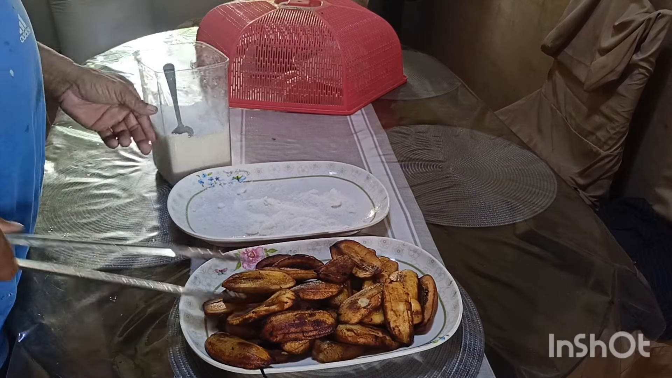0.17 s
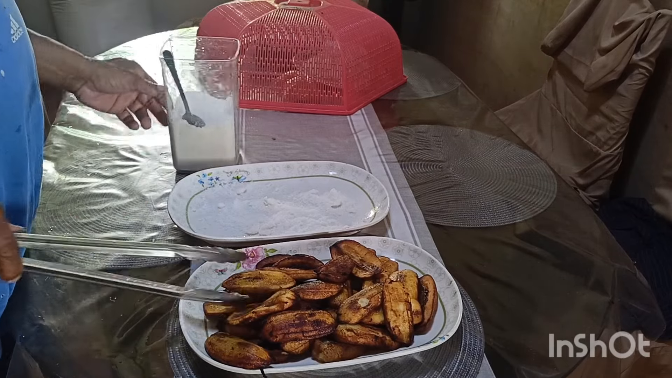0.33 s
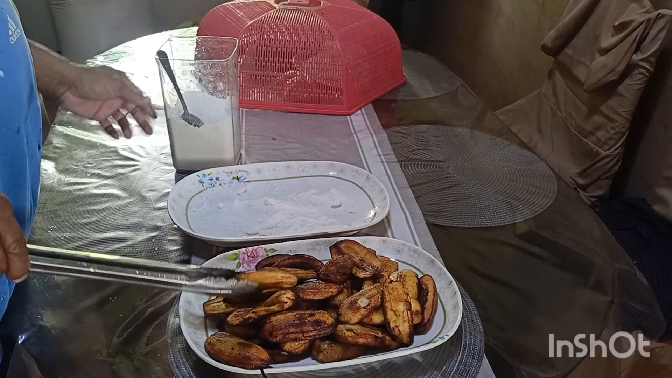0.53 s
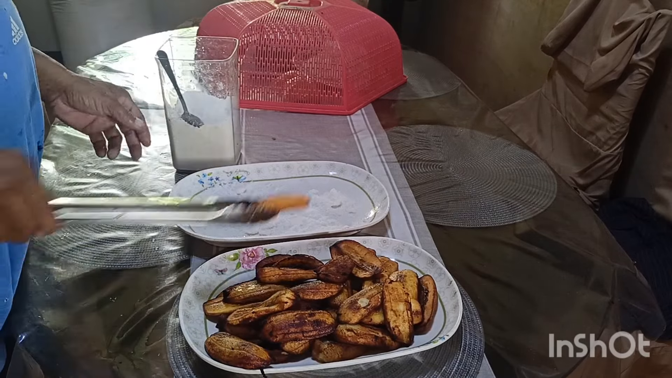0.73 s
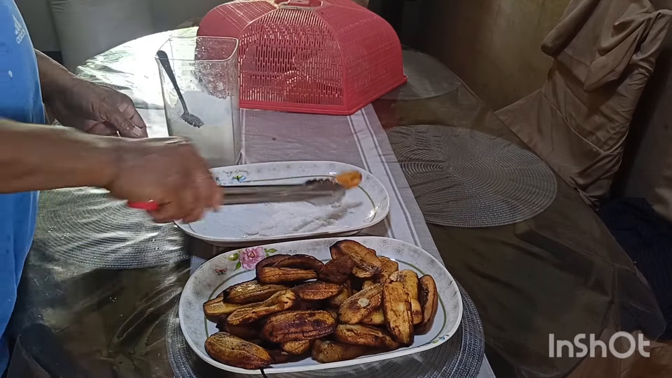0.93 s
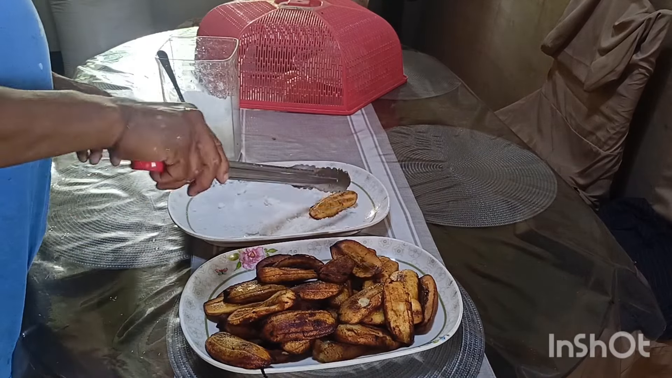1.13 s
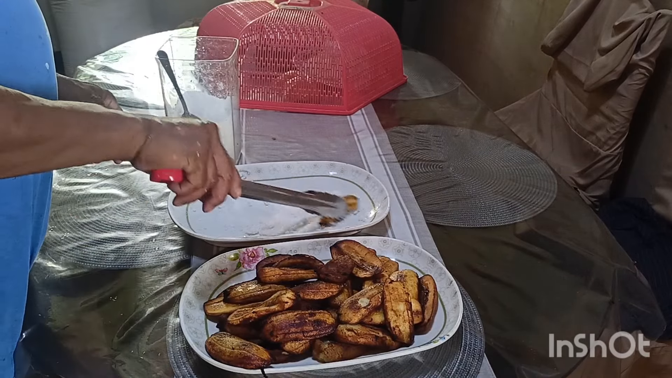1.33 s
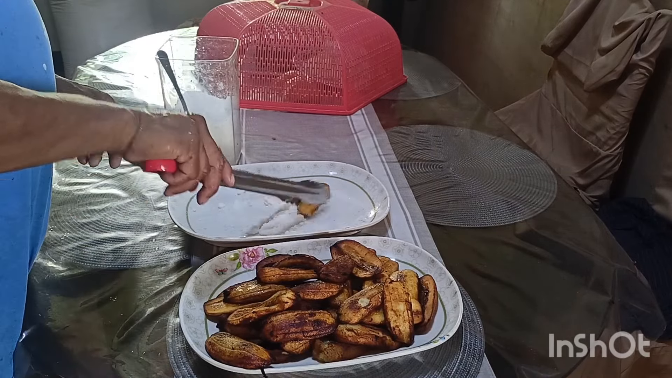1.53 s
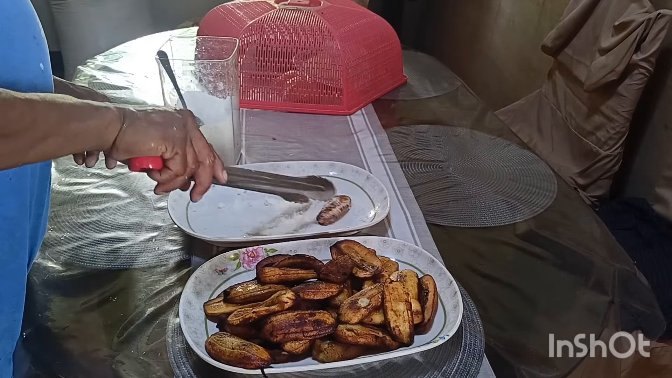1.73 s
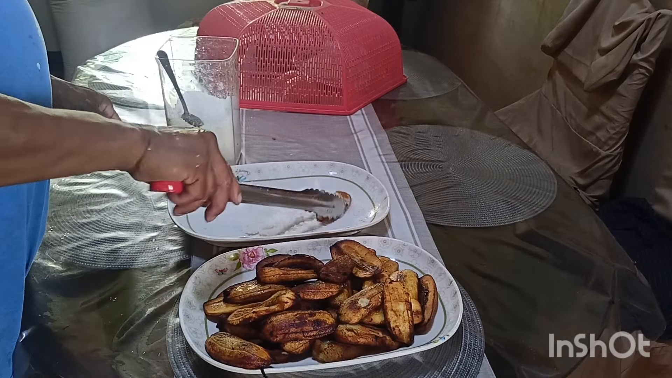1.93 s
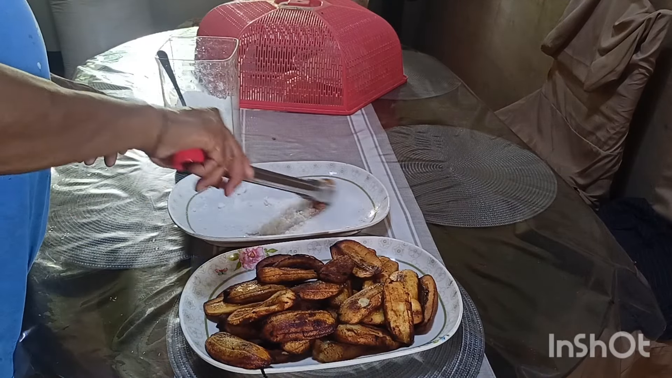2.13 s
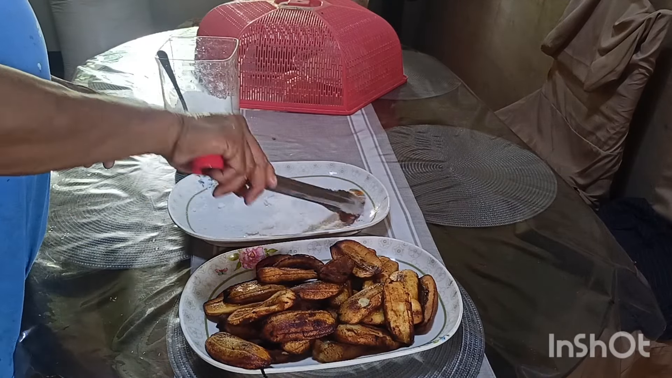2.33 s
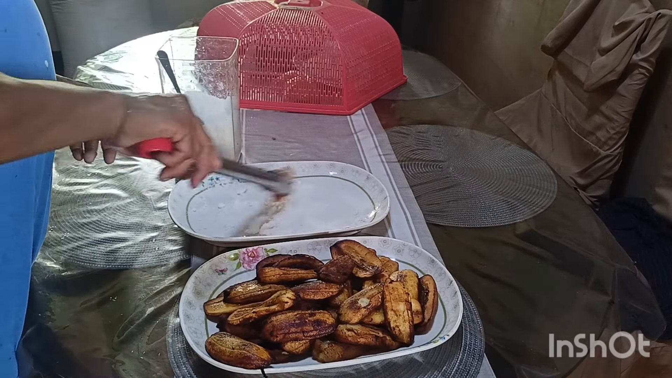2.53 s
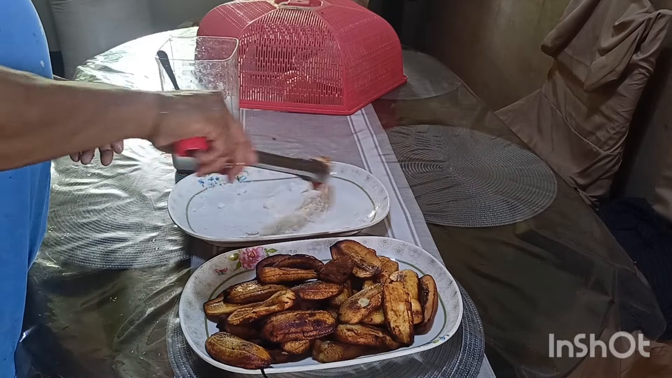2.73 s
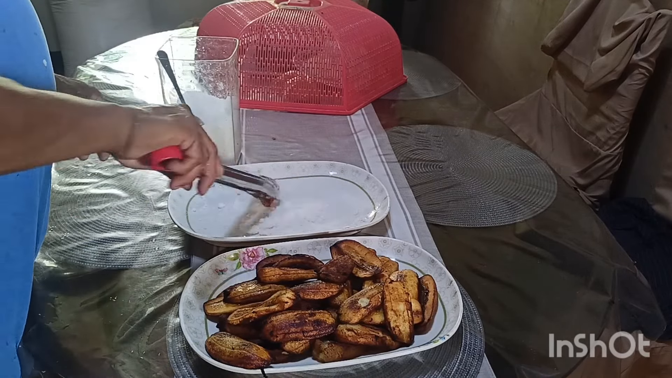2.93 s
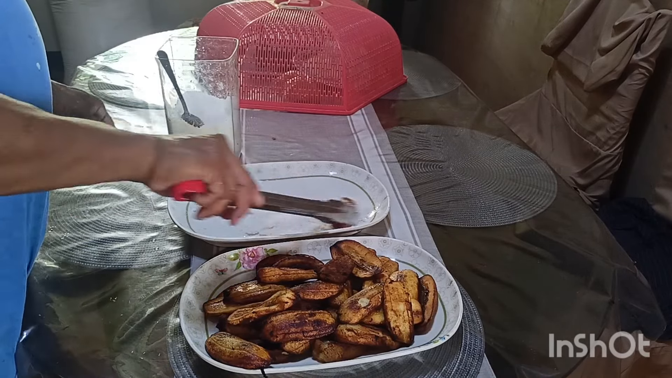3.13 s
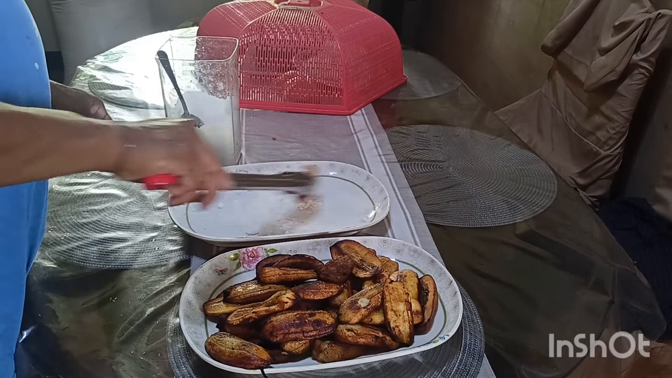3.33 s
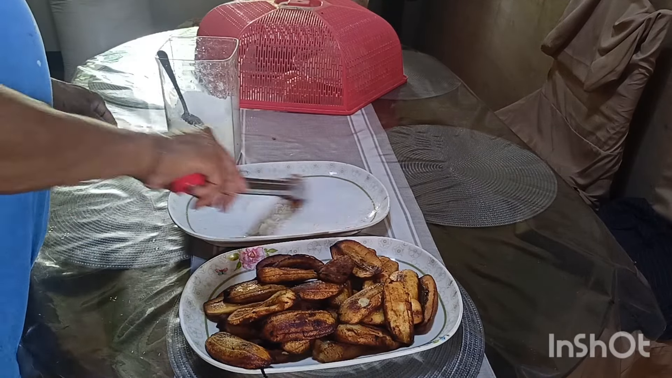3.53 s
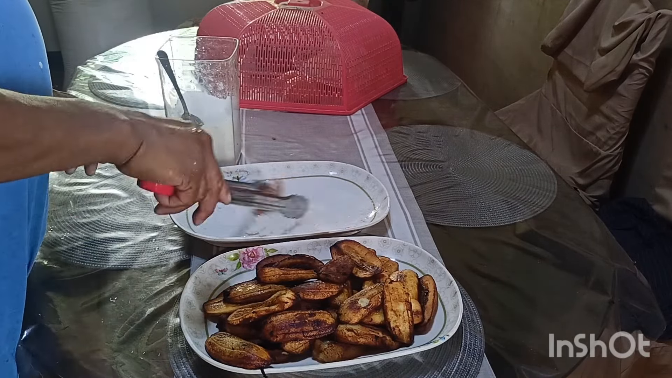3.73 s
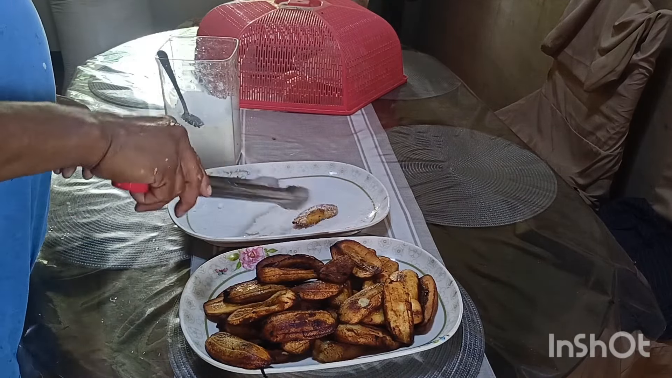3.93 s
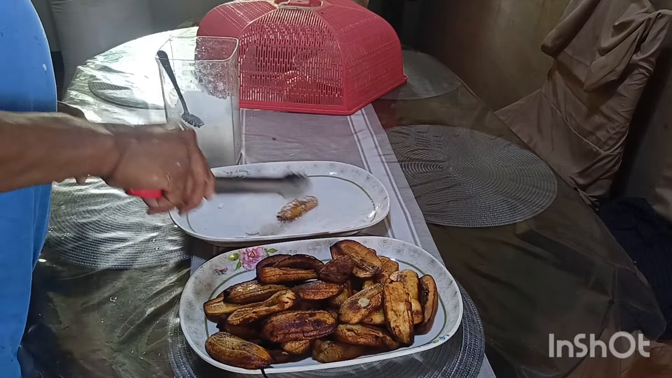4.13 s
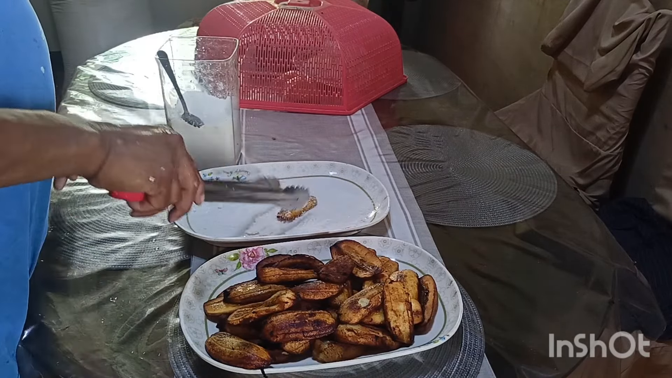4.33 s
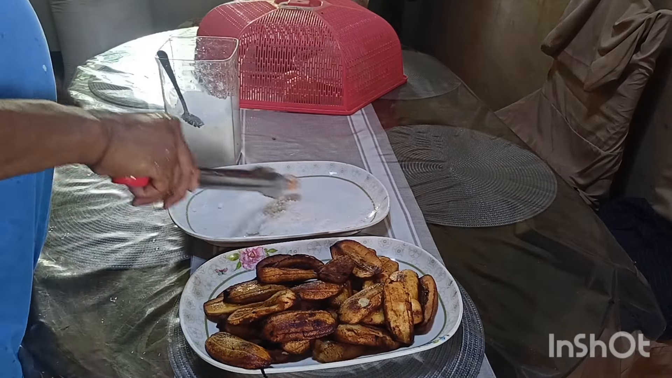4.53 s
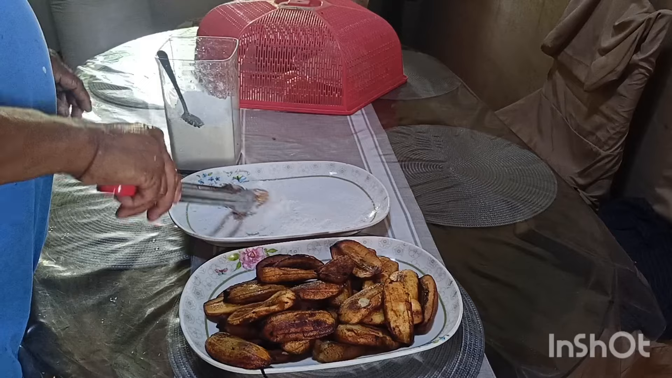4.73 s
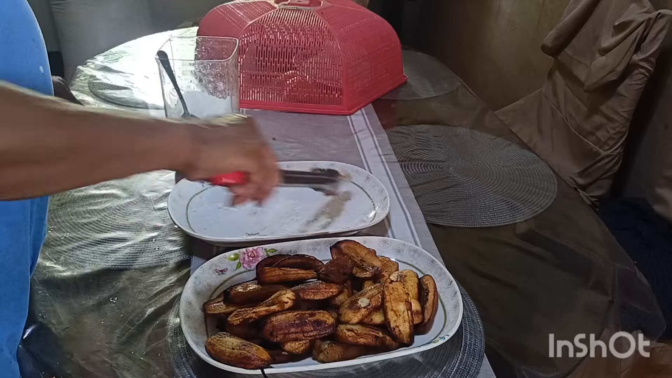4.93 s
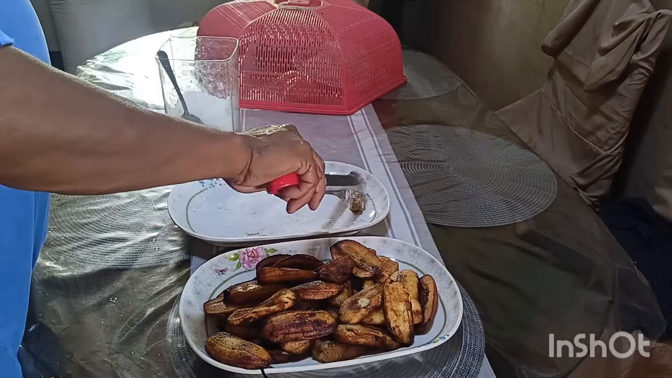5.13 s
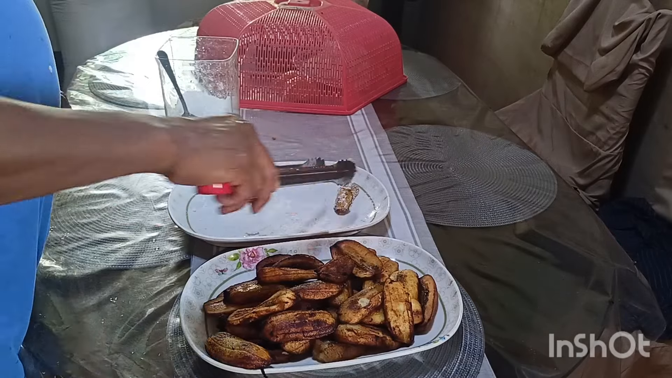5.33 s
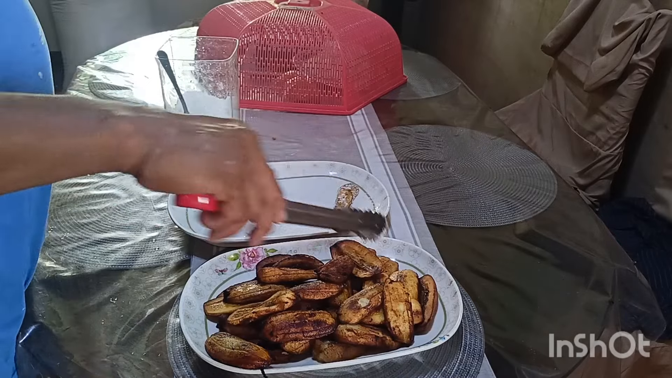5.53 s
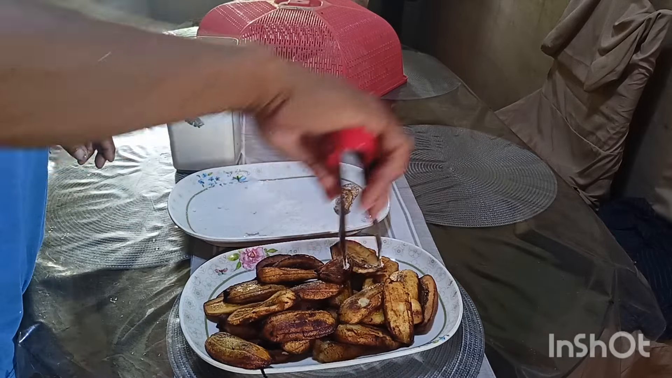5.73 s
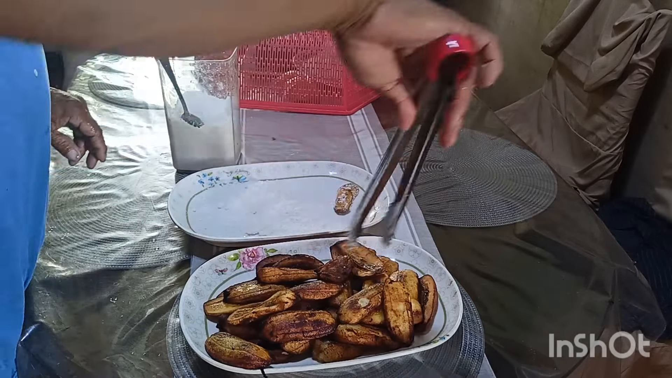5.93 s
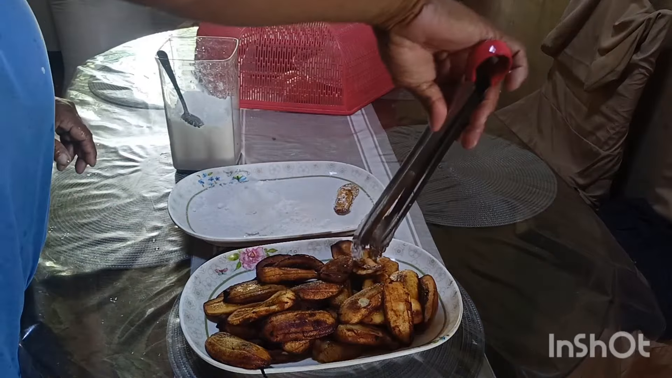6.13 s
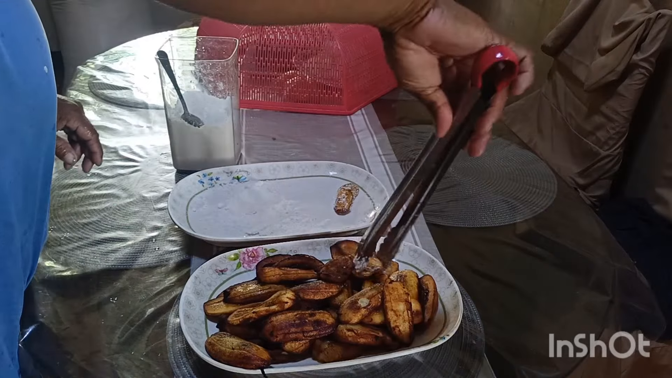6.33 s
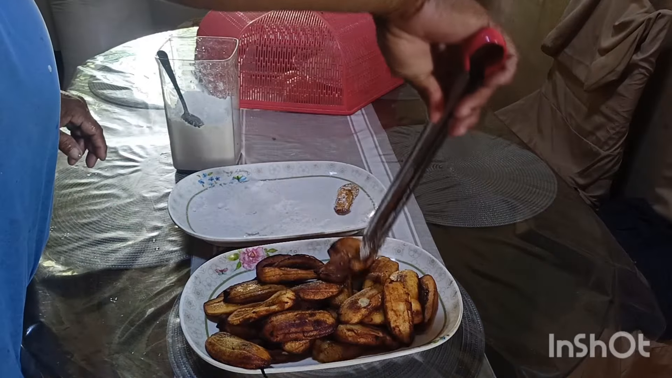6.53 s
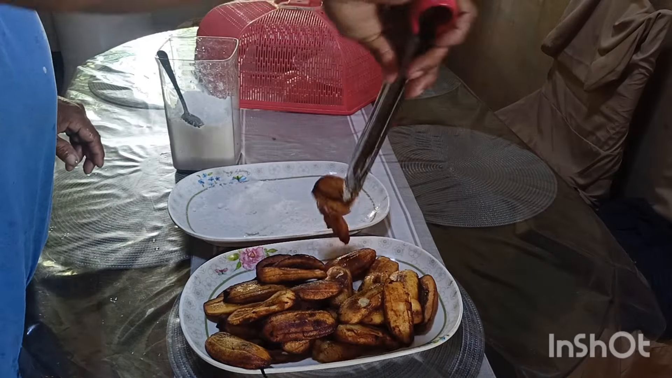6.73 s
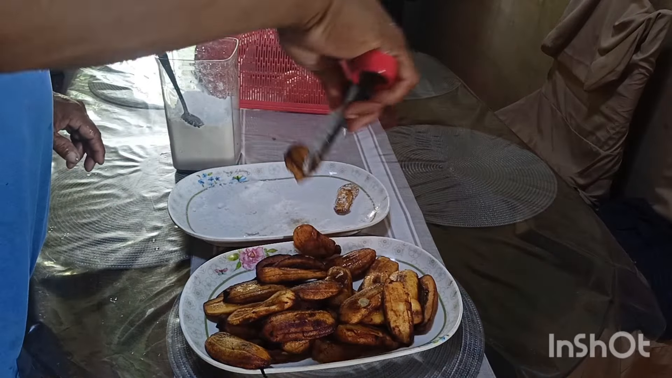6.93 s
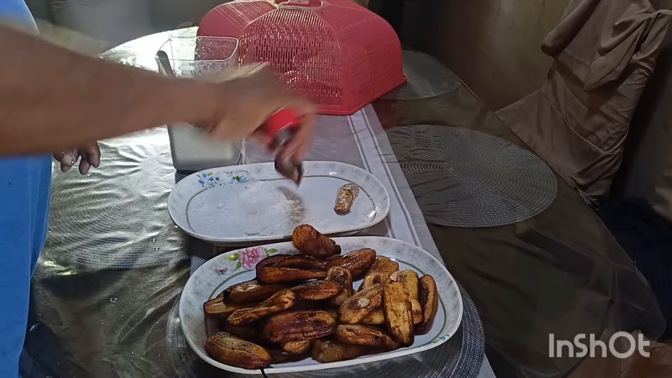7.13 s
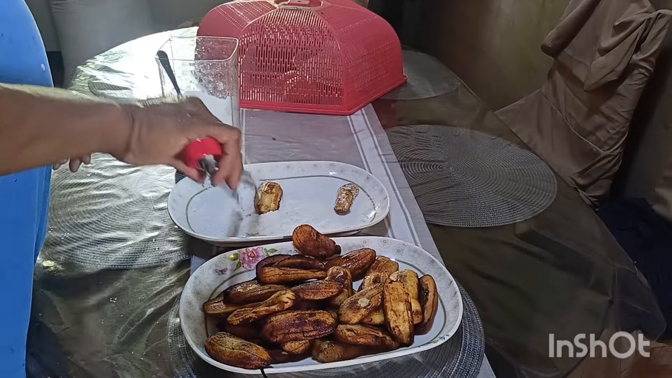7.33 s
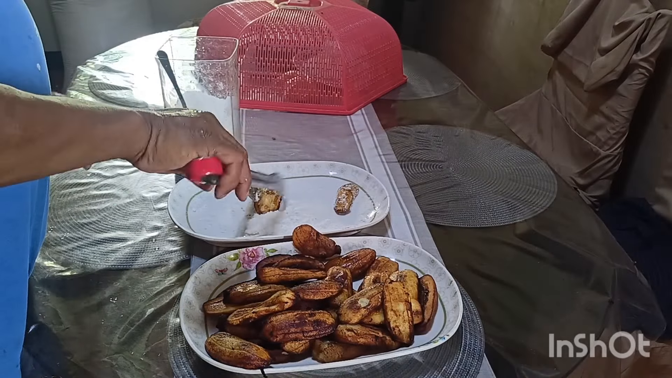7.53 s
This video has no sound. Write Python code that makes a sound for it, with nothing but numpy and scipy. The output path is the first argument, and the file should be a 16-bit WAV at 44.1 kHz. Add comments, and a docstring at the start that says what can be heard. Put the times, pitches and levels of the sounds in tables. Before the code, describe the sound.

Steel tongs click and scrape across a ceramic plate in a small kitchen, with soft food bumps and a faint fan hum.

```python
"""Tongs and fried plantain on a plate

Steel tongs push oily slices about a ceramic plate on a cloth-covered kitchen table. The soft slices
bump and squish. The tips squeak, knock, scrape and tap on the plate; knocks and scrapes set the plate
and the arms of the tongs ringing. A fan hums faintly beside a thin, high hiss. The small room echoes,
and a noise suppressor turns down faint sounds, which shortens their tails."""
import sys
import numpy as np
from scipy import signal
from scipy.fft import rfft, irfft
from scipy.io import wavfile
from scipy.ndimage import uniform_filter1d

SR = 44100
rng = np.random.default_rng(int(sys.argv[2]) if len(sys.argv) > 2 else 0)


def materialize(psi):
    """Save the field psi as 16-bit PCM at rate SR to the path in sys.argv[1].

    A 1-D psi becomes a single channel; in a 2-D psi each row is a channel.
    """
    bounded = np.clip(np.atleast_2d(psi).T, -1, 1)
    quanta = np.round(bounded * 32767).astype(np.int16)
    wavfile.write(sys.argv[1], SR, quanta)


N = 333837

# the plate's tones, damped by the cloth: (pitch [Hz], relative level [dB], time to fade 60 dB [s])
PLATE_TONES = [(305, -9, 0.083), (388, -2, 0.039), (428, -1, 0.07), (550, -10, 0.046), (603, -1, 0.062),
               (687, -2, 0.09), (724, -5, 0.06), (911, -4, 0.05), (985, -6, 0.06), (1210, -12, 0.035),
               (1426, -7.5, 0.047), (1595, -8.5, .06), (1822, -5, 0.037), (2119, -3, 0.039),
               (2360, -14.5, 0.039), (2782, -5, 0.042)]
# the tong arms' tones, damped by the hand: (pitch [Hz], relative level [dB], time to fade 60 dB [s])
ARM_TONES = [(3447, -2, 0.12), (4152, -4.5, 0.12), (4587, 0, 0.12), (4885, 1, 0.12), (5190, 5, 0.15),
             (6058, 2, 0.1), (7873, 8, 0.15), (8355, 7.5, .15), (8759, 5, 0.16), (5360, -12, 0.085),
             (6200, -13.5, 0.068), (6970, 1, .1), (7240, 6, 0.14), (7400, 9, 0.15), (8080, 2, .1),
             (8920, -6.5, 0.11), (13700, -11, 0.12), (14620, -10.5, .12), (15300, -13.5, .1),
             (15570, -16, .1)]
# a spectrum that favours no pitch: (frequency [Hz], level [dB])
FLAT_SPECTRUM = [(1, 0)]


def amp(db):
    """Turns decibels into a gain."""
    return 10 ** (np.asarray(db) / 20)


def unit_power(x):
    """Scales a sound to an average power of one."""
    return x / np.sqrt(np.mean(x ** 2) + 1e-20)


def unit_energy(x):
    """Scales a sound to a total energy of one."""
    return x / np.sqrt(np.sum(x ** 2) + 1e-20)


def look_up(points, hz):
    """Reads between a table's rows along straight lines over log frequency."""
    frequencies, values = np.transpose(points)
    return np.interp(np.log(hz + 1), np.log(frequencies), values)


def add(mix, start, sound):
    """Mixes a sound in at a start time in seconds."""
    part = mix[round(start * SR):][:len(sound)]
    part += sound[:len(part)]


def convolve(x, response):
    """Lets every sample of x set off the response, keeping the length of x."""
    return signal.oaconvolve(x, response)[:len(x)]


def colour(x, spectrum, tilt_db=0, middle_hz=6000, hump_db=0, size=4096):
    """Filters x by a spectrum, tilted and rounded off on both sides of a middle frequency."""
    hz = abs(np.fft.fftfreq(size, 1 / SR))
    octaves = np.log2((hz + 20) / middle_hz)
    db = look_up(spectrum, hz) + tilt_db * np.maximum(octaves, -1)
    db -= hump_db * np.clip(octaves, -3, 2) ** 2
    # minimum phase: the filter never sounds before it is struck
    gains = np.exp(np.conj(signal.hilbert(np.log(amp(db)))))
    return convolve(x, np.fft.ifft(gains).real[:size // 2])


def ringing(tones, t):
    """A struck object rings as fading sine waves, each with a random phase."""
    waves = (amp(db - 60 * t / fade_s) / np.sqrt(fade_s) * np.sin(2 * np.pi * (hz * t + rng.random()))
             for hz, db, fade_s in tones)
    return unit_energy(sum(waves))


def rattle(t, decay_s):
    """A contact is a quickly dying run of tiny impacts."""
    return rng.choice([-1., 1.], len(t)) * np.exp(-t / decay_s)


def drift(rate_hz=6):
    """A slow, random wobble."""
    hz = np.fft.rfftfreq(N, 1 / SR)
    return unit_power(irfft(rfft(rng.standard_normal(N)) * np.exp(-hz / rate_hz), N))


def fan(rush_db=-61.5, hum_db=-1, waver=0.32):
    """A fan hums in a few wavering tones over a rush of air."""
    # the hum: (pitch [Hz], relative level [dB])
    hum_tones = [(113.0, -72.5), (156.1, -71.5), (344.5, -67.5), (398.4, -73), (570.6, -76), (629.8, -74.5)]
    # the rushing air: (frequency [Hz], relative level [dB])
    air_spectrum = [(25, -11), (60, -8), (110, 0), (165, -4), (220, -6), (290, -6.5), (345, -5), (450, -4),
                    (640, -9.5), (900, -13), (2500, -18.5), (8200, -19), (9700, -24), (13000, -28.5),
                    (16000, -18.5)]
    hum, t = np.zeros(N), np.arange(N) / SR
    for hz, db in hum_tones:
        strength = np.sqrt(2) * amp(db) * (1 + waver * drift())
        hum += strength * np.sin(2 * np.pi * hz * t + 0.61 * drift())
    rush = unit_power(colour(rng.standard_normal(N), air_spectrum))
    return amp(rush_db) * rush + amp(hum_db) * hum


def high_hiss(gain_db=-2, middle_hz=11200, width_hz=450, flutter_depth=0.39, flutter_hz=148):
    """A narrow band of high noise flutters as it slowly swells and eases."""
    # the swell of the hiss: (time [s], relative level [dB])
    swell = [(0, -73), (.8, -70), (2.8, -66), (4, -62.5), (5, -64.5), (5.7, -66.5), (7.5, -66)]
    t, hz = np.arange(N) / SR, np.fft.rfftfreq(N, 1 / SR)
    band = 1 / (1 + (abs(hz - middle_hz) / width_hz) ** 3)
    hiss = unit_power(irfft(rfft(rng.standard_normal(N)) * band, N))
    flutter = 1 + flutter_depth * np.sin(2 * np.pi * flutter_hz * t)
    return hiss * amp(gain_db + np.interp(t, *np.transpose(swell))) * flutter


def soft_contacts(contacts, spectrum, gain_db, hump_db, spread_db):
    """Clumps of tiny pops: oily slices stick, tear loose or settle, or a tip taps lightly."""
    out, t = np.zeros(N), np.arange(SR // 3) / SR
    for start, db, middle_hz, decay_s in contacts:
        pops = rattle(t, decay_s) * amp(spread_db * np.minimum(rng.exponential(1, len(t)), 5))
        pops = unit_energy(colour(pops, spectrum, 0, middle_hz, hump_db))
        length_gain = np.sqrt(1 + decay_s / 0.014)  # longer clumps carry more energy
        add(out, start, amp(db + gain_db) * length_gain * pops)
    return out


def slice_bumps():
    """Soft slices land on the plate with dull bumps."""
    # the landings: (time [s], relative level [dB], middle frequency [Hz], decay time [s])
    landings = [(.118, -51.5, 420, 0.0033), (.225, -61.5, 2010, 0.087), (1.045, -60, 656, 0.034),
                (2.27, -55, 1410, 0.024), (4.78, -55.5, 1840, 0.018), (5.245, -37.5, 860, 0.0031),
                (5.268, -44.5, 840, 0.018), (5.425, -53, 640, 0.015), (6.762, -60.5, 2310, 0.013),
                (6.768, -50, 700, 0.017)]
    # a soft bump: (frequency [Hz], relative level [dB])
    bump_spectrum = [(150, -11), (500, 2.5), (900, -1), (1200, -4.5), (3000, 0.5), (9000, -17)]
    return soft_contacts(landings, bump_spectrum, gain_db=21.5, hump_db=8.5, spread_db=3.5)


def small_ticks(ticks_per_s=69, tick_s=0.0076, tick_hz=6200, edge_db=-6, spread_db=2):
    """Small ticks: sticky ones in the slices, and a few light taps of the tips on the plate."""
    # sticky ticks, and light taps on the plate at 5.849, 6.4573 and 6.4838 s:
    # (time [s], relative level [dB], middle frequency [Hz], decay time [s])
    ticks_and_taps = [(.3215, -49.5, 8450, 0.0057), (.33, -53, 7240, 0.062), (.488, -55, 6000, .003),
                      (.567, -55, 7000, 0.012), (1.039, -55.5, 4500, 0.051), (4.614, -52, 7000, 0.011),
                      (4.908, -51.5, 6760, 0.0062), (5.732, -56, 6060, 0.01), (5.849, -50.5, 6900, 0.018),
                      (6.047, -52.5, 7000, .008), (6.201, -54.5, 7200, 0.0042), (6.446, -53, 8000, 0.0065),
                      (6.4573, -47.5, 5000, 0.005), (6.4838, -49.5, 5000, 0.0025),
                      (6.9213, -51, 9100, 0.009), (7.4446, -52.5, 5000, 0.026)]
    # squeezed slices tick in uneven runs: (start [s], length [s], relative level halfway [dB])
    grips = [(0.151, .5, -59.5), (6.334, 0.24, -56), (7.48, 0.18, -56.5)]
    # a small tick: (frequency [Hz], relative level [dB])
    tick_spectrum = [(300, -4), (2600, -8), (4300, 0.5), (6000, -5), (8100, 3.5), (10000, -9.5),
                     (13000, -9), (15500, 1.5)]
    ticks = list(ticks_and_taps)
    for start, length, db in grips:
        count = max(round(length * ticks_per_s), 1)
        places = (np.arange(count) + rng.random(count)) / count
        arch_db = edge_db * (2 * places - 1) ** 2  # strongest halfway through
        levels = db + arch_db + spread_db * rng.standard_normal(count)
        ticks += [(start + length * u, level, tick_hz, tick_s) for u, level in zip(places, levels)]
    return soft_contacts(ticks, tick_spectrum, gain_db=23.5, hump_db=2.5, spread_db=0)


def tip_squeaks():
    """A tip catches and chatters around one pitch."""
    # squeaks and groans: (start [s], length [s], pitch [Hz], bandwidth [Hz], level [dB])
    catches = [(1.036, 0.017, 2930, 250, -58), (1.265, 0.0136, 7850, 455, -42.5),
               (1.298, 0.017, 8550, 500, -44.5), (1.263, 0.073, 4500, 131, -55),
               (1.368, 0.15, 5120, 80, -65), (2.472, 0.064, 602, 46, -56.5), (2.658, 0.031, 617, 37, -54.5),
               (4.646, 0.024, 1480, 90, -58.5), (5.241, 0.0127, 5030, 120, -51)]
    out = np.zeros(N)
    for start, length, hz, width_hz, db in catches:
        t = np.arange(round(length * SR)) / SR
        ring = np.exp(-np.pi * width_hz * t) * np.sin(2 * np.pi * hz * t)
        chatter = unit_power(convolve(rng.standard_normal(SR)[:len(t)], ring))
        add(out, start, amp(db) * chatter * signal.windows.tukey(len(t), .2))
    return out


def plate_tones_near(thud_hz, boost_db=8, width_octaves=0.058):
    """The spot where a tip lands favours the plate's tones near one pitch."""
    return [(hz, db + boost_db * np.exp(-(np.log2(hz / thud_hz) / width_octaves) ** 2), fade_s)
            for hz, db, fade_s in PLATE_TONES]


def tong_knocks(gain_db=23, click_s=0.00078, settle_s=0.0025, shimmer_s=0.012, thud_s=0.0018):
    """Each knock cracks in the steel, rings the arms and thuds in the plate."""
    # the knocks: (time [s], relative steel level [dB], relative plate level [dB], middle of the
    # thud [Hz], treble tilt [dB per octave], arm ring relative to the crack [dB])
    knocks = [(1.264, -39.5, -55, 600, 6, -20), (1.321, -53, -48, 585, 8, -11),
              (1.577, -38, -70, 600, -2, -25), (1.9468, -24, -20.5, 713, -1, -28),
              (1.9617, -26.5, -31.5, 910, -4, -22), (1.986, -33, -52, 800, -14, -10),
              (2.152, -46, -51, 600, 1, -25), (2.491, -38, -55, 600, 3, -23),
              (2.619, -52, -54.5, 910, -2, 1.5), (2.661, -56.5, -61, 590, 6, 1),
              (2.8864, -48, -41, 593, 11, -15), (2.9247, -40, -43.5, 610, 0, -23),
              (2.970, -36, -48, 867, -3, -18), (3.1464, -39, -46, 1180, -2, 1.5),
              (3.201, -40.5, -47, 800, -5, -15), (3.2447, -25.5, -44, 1100, 7, -28),
              (3.25, -28.5, -52.5, 1120, -0.5, -4), (3.4948, -37.5, -48, 800, -5.5, -29),
              (3.571, -31, -42.5, 590, 5.5, 5), (3.7805, -27.5, -26, 395, -3.5, -32),
              (3.893, -49.5, -48, 593, 7.5, 5), (4.164, -37, -76, 870, -1, 6),
              (4.176, -33.5, -51.5, 870, -1, 8.5), (4.4526, -41, -30, 438, 6, -8),
              (4.4552, -29.5, -26.5, 437, 1, -13), (5.2448, -44.5, -43, 754, -1.5, 2),
              (7.249, -53, -56, 1020, 2, 4.5), (7.3002, -40.5, -38, 480, 0, -6)]
    # the crack of a steel tip: (frequency [Hz], relative level [dB])
    crack_spectrum = [(200, -10.5), (1000, -25), (2600, -19), (3400, -8), (5500, -3.5), (6700, -3.5),
                      (8100, 2), (9000, -6.5), (10000, -10.5), (12300, -11.5), (14000, -8), (15600, -13)]
    # the thin arms' many crowded tones: (frequency [Hz], relative level [dB])
    shimmer_spectrum = [(1000, -32), (2750, -42.5), (3400, 3), (5200, 2), (6000, 2), (7700, 10), (8700, 0),
                        (10000, -6), (12300, -24), (13500, 0), (15600, -1)]
    # the plate's thud: (frequency [Hz], relative level [dB])
    thud_spectrum = [(40, -42), (90, -25), (230, -28), (320, -2.5), (700, -14), (1150, -6.5), (2200, 2),
                     (3500, -6.5), (8000, -29.5), (16000, -27)]
    out, t = np.zeros(N), np.arange(SR // 3) / SR
    for start, steel_db, plate_db, thud_hz, tilt_db, ring_db in knocks:
        # one hard click, then the tip rattles as it settles
        contact = 0.4 * unit_energy(rattle(t, click_s)) + unit_energy(rattle(t, settle_s))
        crack = unit_energy(colour(contact, crack_spectrum))
        arms = amp(-10) * ringing(ARM_TONES, t)
        arms += amp(-3) * unit_energy(colour(rattle(t, shimmer_s), shimmer_spectrum))
        steel = unit_energy(colour(crack + amp(ring_db) * arms, FLAT_SPECTRUM, tilt_db))
        steel *= np.hypot(1, amp(ring_db))  # ringing arms add energy
        thud = unit_energy(colour(rattle(t, thud_s), thud_spectrum))
        plate = thud + amp(3) * ringing(plate_tones_near(thud_hz), t)
        plate = unit_energy(colour(plate, FLAT_SPECTRUM, middle_hz=thud_hz, hump_db=3))
        add(out, start, amp(steel_db) * steel + amp(plate_db) * plate)
    return amp(gain_db) * out


def stroke_friction(bite_s=0.0027, lift_s=0.0073):
    """Friction over time: a tip bites into the glaze, swells or eases as it slides, and lifts off."""
    # the strokes: (start [s], length [s], friction halfway [dB], swell from start to end [dB])
    strokes = [(1.274, 0.04, -47.5, 7), (1.365, 0.18, -46.5, -7), (1.493, 0.048, -48, 4),
               (1.541, 0.03, -35.5, 0), (1.58, 0.047, -63, 2), (2.165, .15, -55, -7.5),
               (2.324, 0.14, -57, 8), (2.452, 0.033, -45, 6), (2.64, 0.049, -54.5, 4),
               (2.883, 0.097, -48, -14), (3.145, 0.076, -43.5, -4), (3.225, 0.097, -43.5, -5),
               (3.497, 0.1, -48, 9.5), (3.555, 0.054, -38.5, 6.5), (4.108, 0.027, -53, 8),
               (4.653, 0.059, -54, 7), (4.711, 0.098, -55.5, 6), (4.95, 0.051, -56.5, 7.5),
               (5.11, 0.2, -58.5, 4), (7.28, 0.093, -51, -5.5)]
    out, t = np.zeros(N), np.arange(SR // 2) / SR
    for start, length, db, swell_db in strokes:
        bite = np.minimum(t / bite_s, 1)
        slide = amp(db + swell_db * (np.minimum(t / length, 1) - .5))
        lift = np.exp(-np.maximum(t - length, 0) / lift_s)
        add(out, start, bite * slide * lift)
    return out


def tip_scrapes(slips_per_s=900, spread_db=4, slip_s=0.0048, usual_friction_db=-40):
    """Tips stick and slip: the glaze hisses, the arms and plate ring, and the table rumbles."""
    # the scraped glaze: (frequency [Hz], relative level [dB])
    glaze_spectrum = [(100, -53.5), (500, 4), (1000, -8.5), (2600, -8), (3400, -5), (5200, -3),
                      (6700, -3.5), (8100, 1.5), (9000, -4.5), (10000, -7.5), (12300, -12.5), (14000, -8.5),
                      (15500, -2)]
    # the table under the dragged plate: (frequency [Hz], relative level [dB])
    table_spectrum = [(35, -40), (70, -6), (115, 2), (165, 1), (240, -9), (330, -8), (1000, -48)]
    t, friction = np.arange(SR // 3) / SR, stroke_friction()
    # each slip is a short rattle, on top of a little even noise
    slip_starts = rng.random(N) < slips_per_s / SR
    sizes = slip_starts * amp(spread_db * np.minimum(rng.exponential(1, N), 4))
    roughness = 0.18 + unit_power(convolve(sizes, np.exp(-t / slip_s)))
    slips = unit_power(roughness * rng.standard_normal(N))
    glaze = unit_power(colour(slips, glaze_spectrum)) * friction
    arms = convolve(slips * friction, ringing(ARM_TONES, t))
    # plate and table grow more slowly with friction than the hiss does
    load = friction / amp(usual_friction_db)
    plate_ring = unit_energy(colour(ringing(PLATE_TONES, t), FLAT_SPECTRUM, middle_hz=700, hump_db=6))
    plate = amp(usual_friction_db) * convolve(slips * load ** 0.44, plate_ring)
    table = load ** 0.11 * unit_power(colour(rng.standard_normal(N), table_spectrum))
    return amp(-2) * glaze + amp(-19) * arms + amp(-21) * plate + amp(-63) * table


def kitchen(x, tail_db=-1, build_s=0.0021, wall_s=0.036, wall_db=-15):
    """The room adds one wall echo and a dense tail of echoes that dies away band by band."""
    # the room's echo tail: (frequency [Hz], time to fade 60 dB [s])
    fade_times = [(150, 0.58), (500, 0.24), (1500, 0.37), (4000, 0.36), (8000, 0.26), (15000, 0.19)]
    size = SR // 2
    echoes = rng.choice([-1., 1.], size) * (rng.random(size) < 1 / 8)
    hz, t, bands = signal.stft(echoes, SR, nperseg=256)
    bands *= amp(-60 * t / look_up(fade_times, hz)[:, None])
    tail = signal.istft(bands, SR, nperseg=256)[1][:size]
    # even out the tail's spectrum, so that no broad band of echoes stands out by chance
    spectrum = rfft(tail, 2 * size)
    broad_power = uniform_filter1d(abs(spectrum) ** 2, size=70)
    tail = irfft(spectrum / np.sqrt(broad_power + 1e-12))[:size]
    build_up = 1 - np.exp(-np.arange(size) / SR / build_s)
    response = amp(tail_db) * unit_energy(tail * build_up)
    response[0] += 1  # the direct sound
    add(response, wall_s, amp([wall_db]))
    return convolve(x, response)


def scene():
    """Tongs, plate and food sound in the kitchen over the fan and the hiss."""
    background = fan() + high_hiss()
    tongs = tong_knocks() + tip_scrapes() + tip_squeaks()
    small_sounds = slice_bumps() + small_ticks()
    return (kitchen(tongs + small_sounds) + background)[None]


def record(dry, threshold_db=-48, max_cut_db=8, slope=1.1, bass_hz=450, bottom_hz=40, top_hz=15850):
    """A noise suppressor turns down all but the bass when faint; filters trim both ends of the range."""
    bass = signal.sosfiltfilt(signal.butter(2, bass_hz, fs=SR, output="sos"), dry)
    upper = dry - bass
    upper_db = 10 * np.log10(abs(uniform_filter1d(upper ** 2, size=700)) + 1e-12)
    gain_db = np.clip(slope * (upper_db - threshold_db), -max_cut_db, 0)
    out = bass + upper * amp(gain_db)
    out = signal.sosfilt(signal.butter(3, bottom_hz, "highpass", fs=SR, output="sos"), out)
    treble_cut = signal.firwin(401, top_hz, window=("kaiser", 5), fs=SR)
    return signal.oaconvolve(out, treble_cut[None], "same")


dry = scene()
out = record(dry)
materialize(out)
```